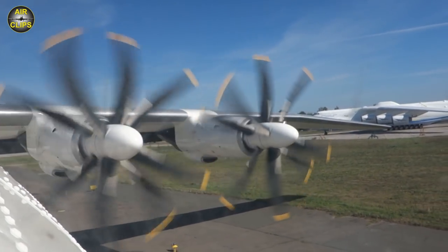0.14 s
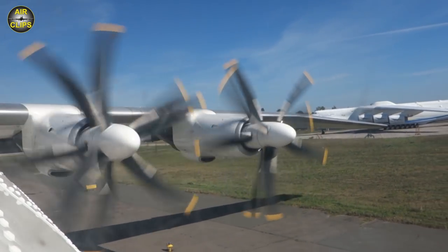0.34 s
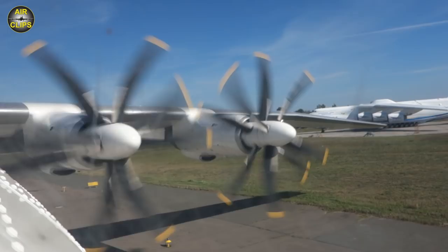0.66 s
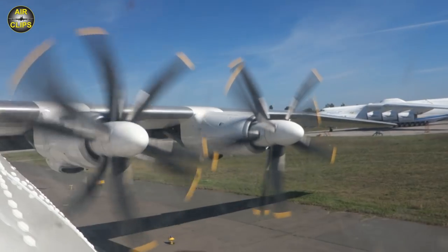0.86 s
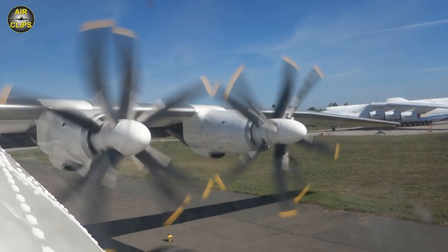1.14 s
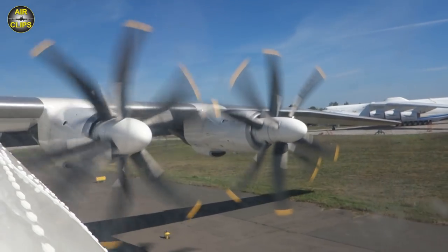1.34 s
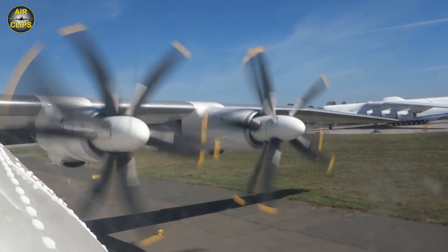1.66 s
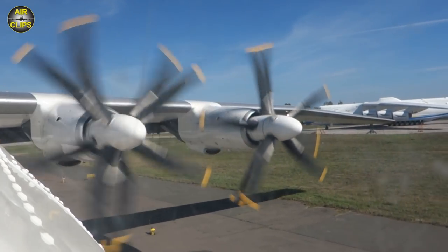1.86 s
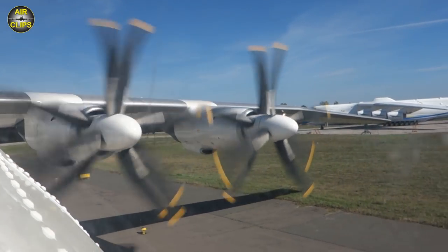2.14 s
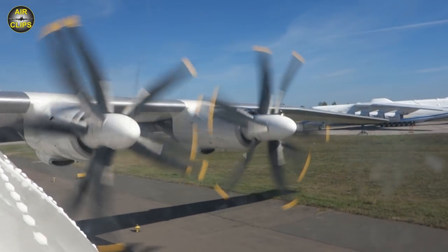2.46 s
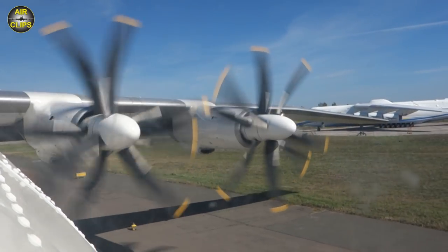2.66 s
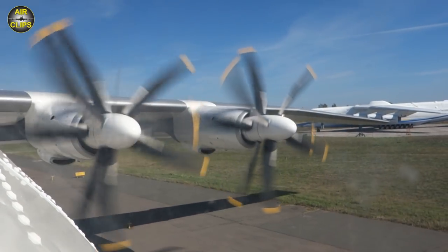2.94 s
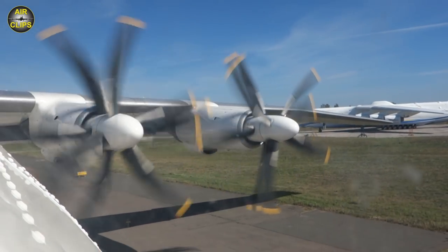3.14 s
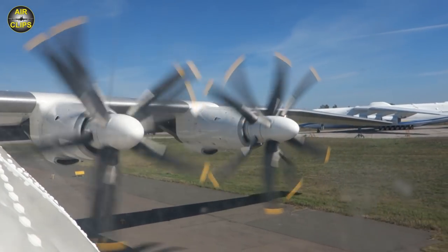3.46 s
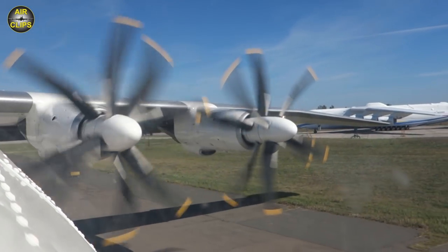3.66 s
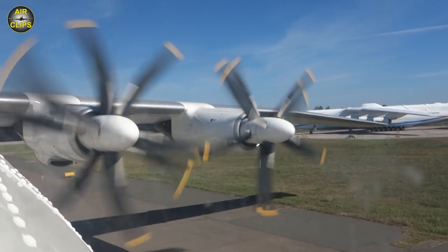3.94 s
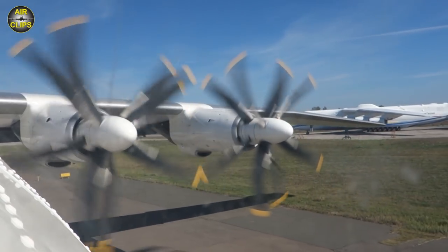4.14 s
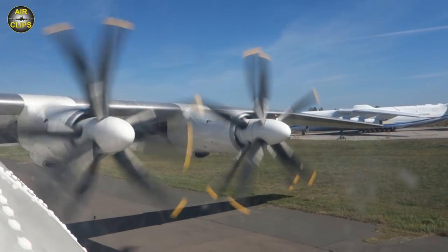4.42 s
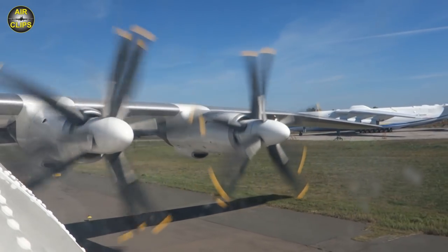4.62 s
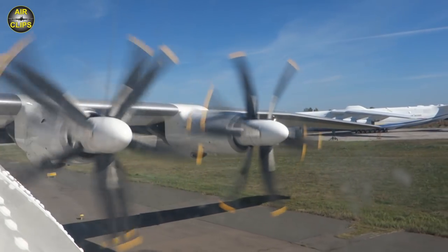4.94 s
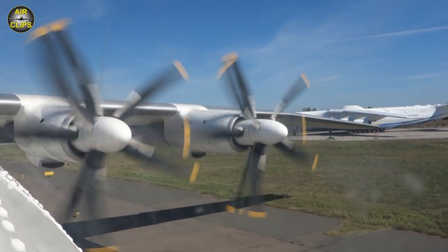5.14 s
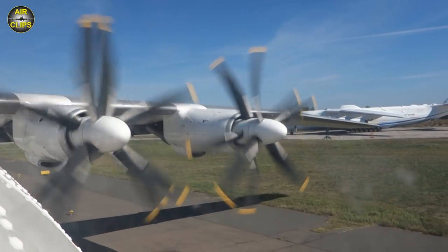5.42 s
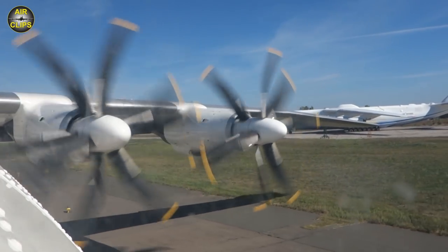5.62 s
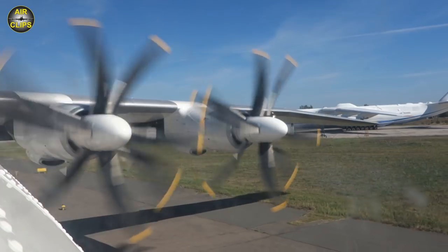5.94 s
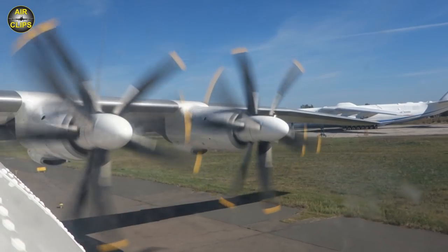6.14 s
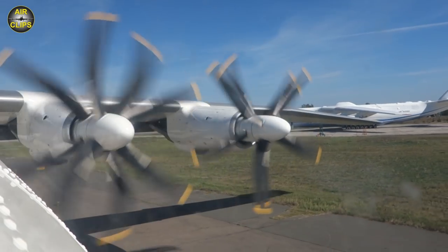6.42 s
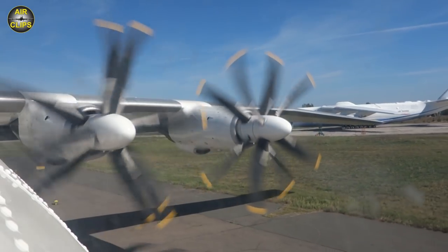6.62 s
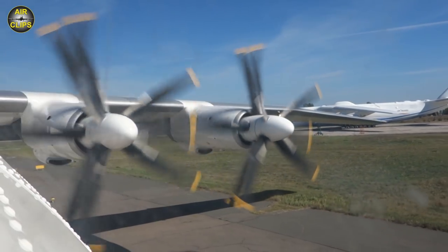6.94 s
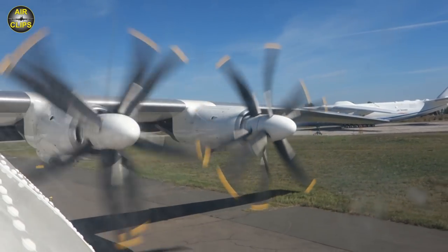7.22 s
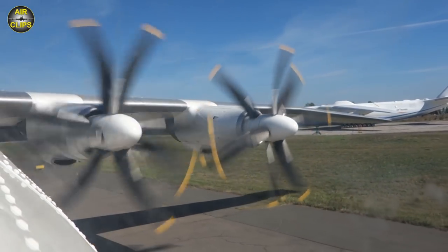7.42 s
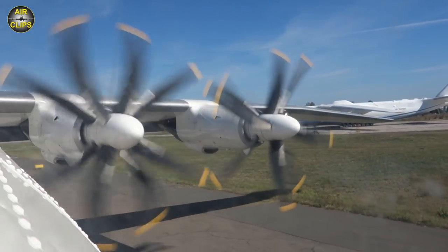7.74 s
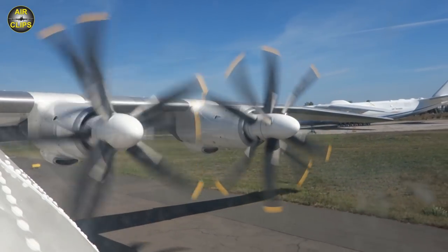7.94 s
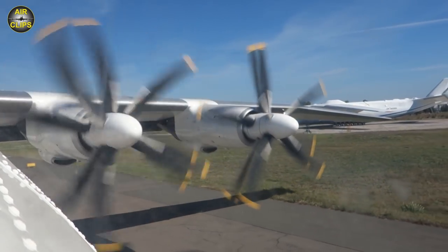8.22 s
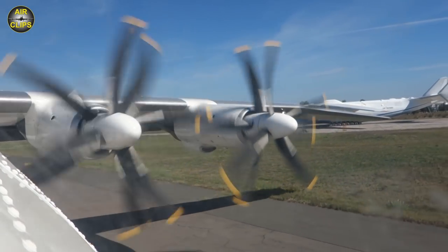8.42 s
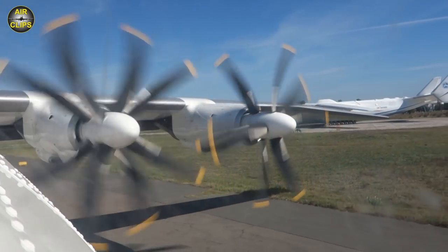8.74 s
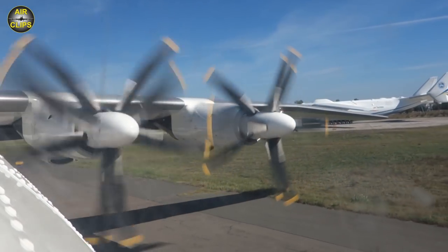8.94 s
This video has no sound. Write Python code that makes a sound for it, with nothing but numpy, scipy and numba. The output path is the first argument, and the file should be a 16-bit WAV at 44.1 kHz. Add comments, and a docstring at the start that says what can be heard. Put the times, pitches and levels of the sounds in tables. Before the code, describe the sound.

Heard from an aircraft cabin window, large propellers on the ground boom and beat heavily under muffled roar, faint hiss and a high whine gliding down.

```python
"""Turboprop engines with contra-rotating propellers run on the ground, heard at a cabin window.
Blade tones (sines and wandering orders) and prop wash (shaped noise) boom through the fuselage skin.
Roar and hiss, noise chopped by the blades, pass the window; a gear whine with blade-rate sidebands
follows the near engine, which spools down at the end as a broad hiss joins.
A fast gain control rides the boom."""
import sys
import numpy as np
from scipy import signal
from scipy.fft import rfft, irfft, next_fast_len
from scipy.io import wavfile
from scipy.ndimage import uniform_filter1d
from numba import njit

SR = 44100
rng = np.random.default_rng(int(sys.argv[2]) if len(sys.argv) > 2 else 0)


def wav_out(sig):
    """Save sig, one row per channel (or a flat mono array), as 16-bit PCM at SR to the path in sys.argv[1]."""
    wavfile.write(sys.argv[1], SR, np.round(np.clip(np.atleast_2d(sig).T, -1, 1) * 32767).astype(np.int16))


N = 399987
TIME_S = np.arange(N) / SR

# All levels in the tables are ahead of the gain control.
# Prop wash through the skin. Each row: frequency in Hz, left and right level in dB per Hz,
# likeness of the sides from -1 to 1.
BOOM_SPECTRUM = [(15, -65.5, -65.5, .98), (60, -59.5, -62, .99), (89, -49.5, -55, 1),
                 (107.7, -40, -39, 0.98), (118, -48, -48, 0.99), (134, -39.5, -40.5, 0.95),
                 (209, -40, -39.5, 0.97), (312, -39, -39.5, .98), (385, -38.5, -38.5, 0.94),
                 (501.7, -37, -36, 0.97), (543, -50.5, -52.5, 0.93), (586, -63.5, -63.5, .9),
                 (810, -89.5, -90, .9)]
# Firm tones of the near propeller. Each row: time in seconds, blade order 2 in dB, order 5 in dB.
NEAR_BLADE_LEVELS = [(0.0, -32, -30), (0.35, -21.5, -28), (0.8, -31, -24), (1.7, -40, -26), (2.3, -36, -23),
                     (3.15, -29, -26), (3.7, -22, -17.5), (4.2, -34, -28), (4.55, -22, -18),
                     (5.0, -30, -24), (5.6, -30, -30), (6.4, -37, -34), (6.85, -38, -22), (7.3, -25, -24),
                     (7.6, -40, -24), (8.2, -34, -29.5), (9.07, -32, -33)]
# Firm tones of the other engines. Each row: time in seconds, blade order 2 in dB, order 3 in dB.
OTHER_BLADE_LEVELS = [(0.0, -41, -26), (0.35, -42, -20), (1.0, -44, -25), (2.3, -42.5, -27),
                      (3.8, -45, -20), (4.3, -46, -25.5), (5.3, -38, -19), (6.4, -35, -20.5),
                      (6.8, -43, -27.5), (7.1, -41, -20.5), (8.0, -38, -22.5), (8.4, -27, -33),
                      (8.8, -23.5, -37), (9.07, -21, -17)]
# Orders that swell and fade as turbulence meets the blades. Each row: multiple of the blade rate,
# level in dB of near and other engines together, waver rate in Hz.
LOOSE_ORDERS = [(1, -51.5, 2.8), (3, -37, 2.46), (4, -28.5, 2.5), (6, -31.5, 3.9), (7, -24, 7.),
                (8, -25.5, 16.), (9, -26.5, 12.)]
# Blade-tip roar through the window panes. Each row: frequency in Hz, left and right level in dB per Hz,
# likeness of the sides from -1 to 1.
ROAR_SPECTRUM = [(470, -62, -62.5, 0.97), (596, -54, -51, 0.87), (793, -56, -57.5, 0.86),
                 (828, -51.5, -53.5, 0.94), (906, -58, -59, 0.72), (936, -51, -49.5, 0.97),
                 (1033.5, -54, -50, 0.97), (1117, -66.5, -68.5, 0.27), (1293, -58, -58, 1),
                 (1403, -64, -60, 0.91), (1581, -57, -52.5, 0.96), (1737, -60.5, -63, 0.88),
                 (2090, -67, -61.5, 0.85), (2260, -82, -69, 0.39), (2310, -81, -74, 0.41),
                 (2500, -99, -90.5, 0.4)]
# Jet and intake hiss past the window seal. Each row: frequency in Hz, left and right level in dB per Hz,
# likeness of the sides from -1 to 1.
HISS_SPECTRUM = [(2200, -92, -83.5, 0.4), (2390, -86, -78, 0.32), (2616, -73.5, -73, 0.58),
                 (2890, -85.5, -78, 0.22), (3330, -84, -79, 0.3), (3700, -76, -75.5, 0.73),
                 (4070, -87.5, -82.5, 0.3), (5130, -91, -85, 0.29), (5950, -90, -86, 0.42),
                 (6500, -91, -86, -0.26), (6930, -89.5, -90, 0.06), (7170, -84.5, -83, 0.26),
                 (7680, -91, -91.5, 0.0), (8900, -90.5, -89.5, -0.19), (11030, -96, -94, -0.19)]
# Swells shared by roar and hiss. Each row: time in seconds, level change in dB.
FLOW_SWELLS = [(0.0, 0), (0.3, 2.5), (0.6, 0.5), (1.2, .5), (2.1, -0.5), (2.9, 1.5), (3.3, -.5), (3.6, 0.7),
               (4.3, -1.4), (5.4, 0.3), (5.9, -0.5), (6.6, 1.5), (6.9, -0.1), (7.2, 1.5), (8.0, -1),
               (8.4, 1), (8.55, 0), (8.7, 2), (9.07, 0)]
# Near engine speed, hunting slowly, then running down. Each row: time in seconds, gear whine in Hz.
GEAR_SPEED = [(0.0, 3507), (0.35, 3529), (1.1, 3540), (2.1, 3577), (2.6, 3593), (3.15, 3595), (4.2, 3560),
              (4.75, 3550), (5.25, 3558), (6.0, 3586), (6.5, 3594), (6.85, 3572), (7.3, 3503), (8.2, 3324),
              (9.07, 3120)]
# Whine that comes and goes. Each row: time in seconds, tone in dB, lower sideband in dB,
# each of the three lines at the octave in dB.
WHINE_LEVELS = [(0.0, -72, -72, -80), (0.25, -66, -71, -84), (0.4, -52, -69, -84), (0.6, -62, -64, -86),
                (0.9, -50, -69, -68), (1.45, -50.5, -65, -68), (1.65, -56, -59, -71), (2.3, -57, -61, -76),
                (2.75, -51, -56, -72), (3.1, -56, -65, -68), (3.45, -70, -60, -78), (3.9, -55, -64, -80),
                (4.35, -70, -60, -82), (4.6, -57, -69, -79), (5.5, -53, -58, -69), (6.0, -62, -57, -78),
                (6.55, -61, -51, -76), (6.9, -52, -59, -76), (7.25, -45, -59, -71), (7.42, -49, -58, -75),
                (7.6, -61, -64, -82), (7.8, -51, -71, -76), (8.2, -56, -70, -84), (8.45, -74, -72, -84),
                (8.8, -59, -69, -76), (9.07, -72, -72, -84)]
# Broad hiss late in the run-down. Each row: frequency in Hz, left and right level in dB per Hz,
# likeness of the sides from -1 to 1.
LATE_HISS_SPECTRUM = [(2300, -82, -77, .3), (4300, -87, -84, .2), (6500, -89, -86, 0.),
                      (11020, -95, -94, 0.)]

OTHER_BLADE_HZ = 49.0
WHINE_PER_BLADE = 73.7  # gear whine frequency / near blade rate
UPPER_SIDEBAND_REL_DB = -4  # against the lower sideband
SECOND_SIDEBAND_DB = -68
LATE_START_S, LATE_RISE_S = 8.58, 0.12
GAIN_RATIO, ATTACK_S, RELEASE_S = 5.0, 0.001, 0.018
GAIN_PIVOT_DB = -10  # level the gain control leaves unchanged
TOP_HZ = 11030


def undb(db):
    """dB to amplitude gain."""
    return 10 ** (np.asarray(db) / 20)


def curves(table):
    """Columns after the time column, interpolated to one value per sample."""
    time_s, *columns = np.transpose(table)
    return [np.interp(TIME_S, time_s, column) for column in columns]


def walk(rate_hz):
    """Random levels held 1 / rate_hz and smoothed twice; spread near 1."""
    hold = int(SR / rate_hz)
    steps = np.repeat(rng.standard_normal(N // hold + 1), hold)
    slewed = uniform_filter1d(uniform_filter1d(steps, hold), hold)
    return np.sqrt(2) * slewed[:N]


def turns(hz):
    """Running phase in radians."""
    return 2 * np.pi * np.cumsum(hz) / SR


def tone(phase, rms_db):
    """Sine of the given rms level, random start phase."""
    return np.sqrt(2) * undb(rms_db) * np.sin(phase + rng.uniform(0, 2 * np.pi))


def rush(table):
    """Stereo noise, coloured per side, partly alike; silent outside the table."""
    hz, left_db, right_db, alike = np.transpose(table)
    size = next_fast_len(N)
    log_bins = np.log(np.arange(size // 2 + 1) * SR / size + 1)

    def read(column, outside):
        return np.interp(log_bins, np.log(hz), column, left=outside, right=outside)

    likeness = np.clip(read(alike, 0), -1, 1)
    noise = rfft(rng.standard_normal((2, size)))
    mid, side = noise * np.sqrt([1 + likeness, 1 - likeness])
    left = undb(read(left_db, -200)) * (mid + side)
    right = undb(read(right_db, -200)) * (mid - side)
    return np.sqrt(SR) / 2 * irfft(np.array([left, right]), size)[:, :N]


def boom():
    """Prop wash drumming through the fuselage skin: low shaped noise."""
    return rush(BOOM_SPECTRUM)


def propellers(near, far):
    """Firm low blade tones that waver a little; looser orders wander freely in size and phase."""
    phases = (2 * near, 5 * near, 2 * far, 3 * far)
    levels_db = curves(NEAR_BLADE_LEVELS) + curves(OTHER_BLADE_LEVELS)
    out = np.zeros(N)
    for phase, level_db in zip(phases, levels_db):
        out += tone(phase + 0.63 * walk(4.0), level_db + 1.5 * walk(5.0))
    for order, level_db, waver_hz in LOOSE_ORDERS:
        for blade in (near, far):
            order_phase = round(order) * blade
            wander = walk(waver_hz) * np.cos(order_phase) + walk(waver_hz) * np.sin(order_phase)
            out += undb(level_db) * wander / np.sqrt(2)
    return out


def blade_chop(near, far):
    """Amplitude factor: each passing blade throbs in the noise."""
    return 1 + 0.048 * np.cos(near) + 0.03 * np.cos(far)


def roar(flow_db, gust, chop):
    """Blade-tip noise through the panes, swelling with the flow and chopped by the blades."""
    return rush(ROAR_SPECTRUM) * undb(flow_db + 0.72 * gust + 0.7 * walk(14.0)) * chop


def hiss(flow_db, gust, chop):
    """Jet and intake noise past the seal, with the late hiss, swelling and chopped like the roar."""
    noise = rush(HISS_SPECTRUM) + late_hiss()
    return noise * undb(flow_db + 0.85 * gust + 0.6 * walk(18.0)) * chop


def whine(gear, blade, gear_hz):
    """Gear tone through the turning blades, which split it into sidebands one blade rate apart."""
    tone_db, side_db, octave_db = curves(WHINE_LEVELS)
    gear = gear + 0.33 * walk(14.0)  # the air path trembles
    out = tone(gear, tone_db + 1.8 * walk(12.0))
    out += tone(gear + 2 * blade, SECOND_SIDEBAND_DB + 2.5 * walk(4.0))
    out += tone(gear - blade, side_db + 2.5 * walk(6.0))
    out += tone(gear + blade, side_db + UPPER_SIDEBAND_REL_DB + 3 * walk(5.0))
    for k in (-1, 0, 1):
        out += tone(2 * gear + k * blade, octave_db + 3 * walk(6.0))
    # the lower whine falls where the left side of the window is dull
    lean_db = np.interp(gear_hz, [3345, 3420], [3.0, 0.2])
    return out * undb(np.array([-lean_db, lean_db]))


def late_hiss():
    """Broad noise that fades in late in the run-down."""
    return rush(LATE_HISS_SPECTRUM) * np.clip((TIME_S - LATE_START_S) / LATE_RISE_S, 0, 1)


def scene():
    """Boom, blade tones, roar, hiss and whine as they reach the window."""
    flow_db, gear_hz = curves(FLOW_SWELLS)[0], curves(GEAR_SPEED)[0]
    gear = turns(gear_hz)
    near = gear / WHINE_PER_BLADE
    far = turns(OTHER_BLADE_HZ + 0.0801 * walk(0.706))
    gust = walk(14.0)  # one eddy lifts roar and hiss together
    chop = blade_chop(near, far)
    wash = boom() + propellers(near, far)
    return wash + roar(flow_db, gust, chop) + hiss(flow_db, gust, chop) + whine(gear, near, gear_hz)


@njit
def follow(x, attack, release):
    """One-pole level follower: quick up, slower down; starts at the mean."""
    level, out = x.mean(), np.empty(len(x))
    for i in range(len(x)):
        level += (x[i] - level) * (attack if x[i] > level else release)
        out[i] = level
    return out


def record(dry):
    """Fast gain control on the power of both sides together, then a steep low-pass."""
    power = uniform_filter1d(np.mean(dry ** 2, axis=0), size=200)
    power = follow(power, 1 / (ATTACK_S * SR), 1 / (RELEASE_S * SR))
    held = dry * (undb(GAIN_PIVOT_DB) / np.sqrt(power)) ** (1 - 1 / GAIN_RATIO)
    low_pass = signal.ellip(12, 0.2, 80, TOP_HZ, fs=SR, output="sos")
    return signal.sosfilt(low_pass, held)


dry = scene()
out = record(dry)
wav_out(out)
```